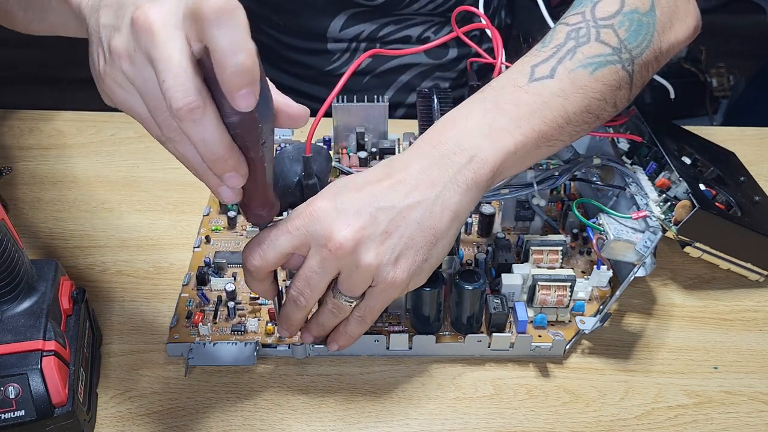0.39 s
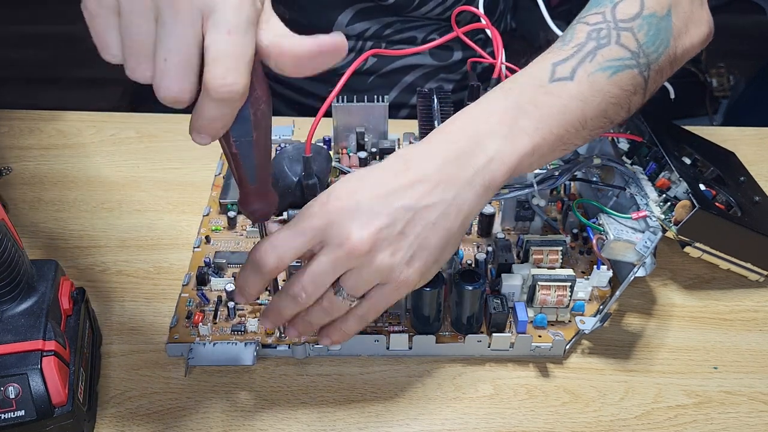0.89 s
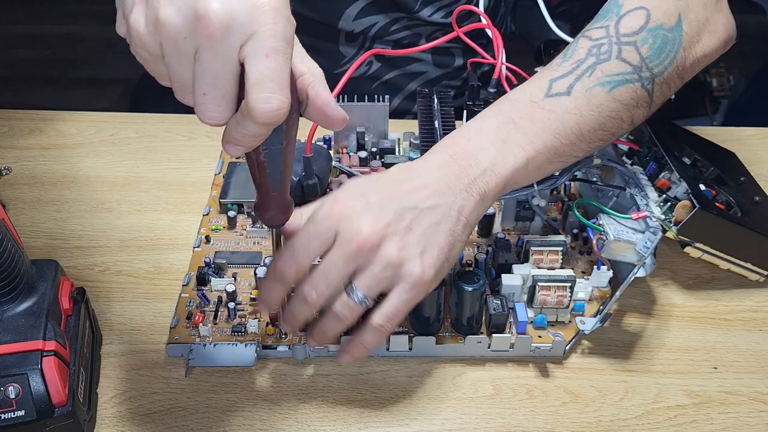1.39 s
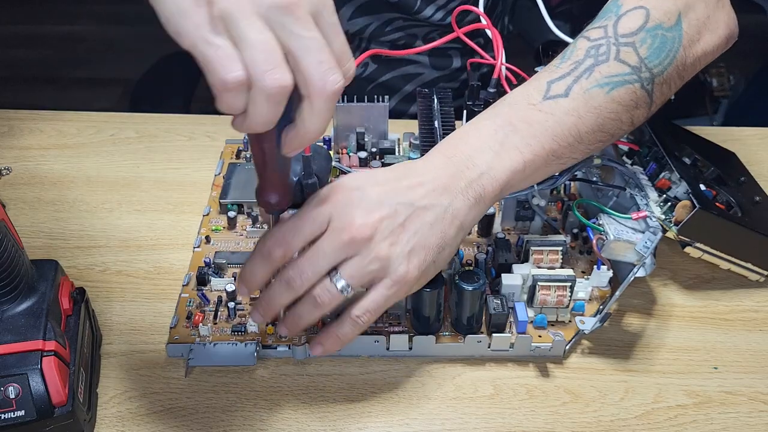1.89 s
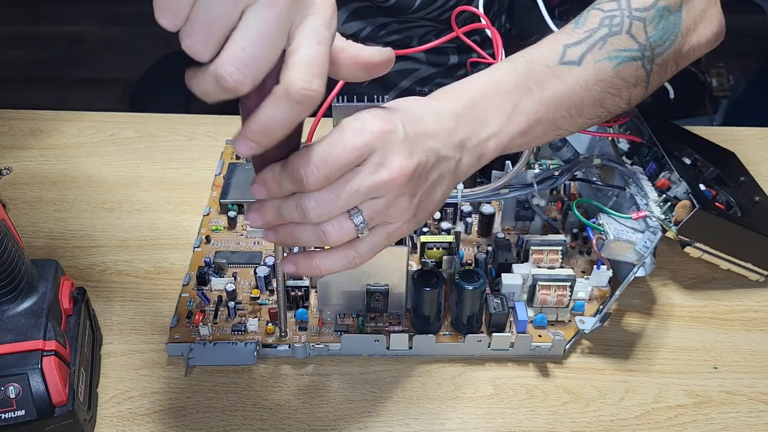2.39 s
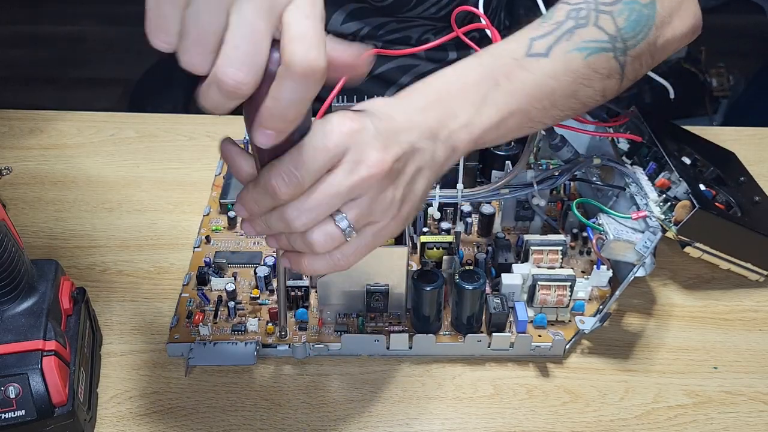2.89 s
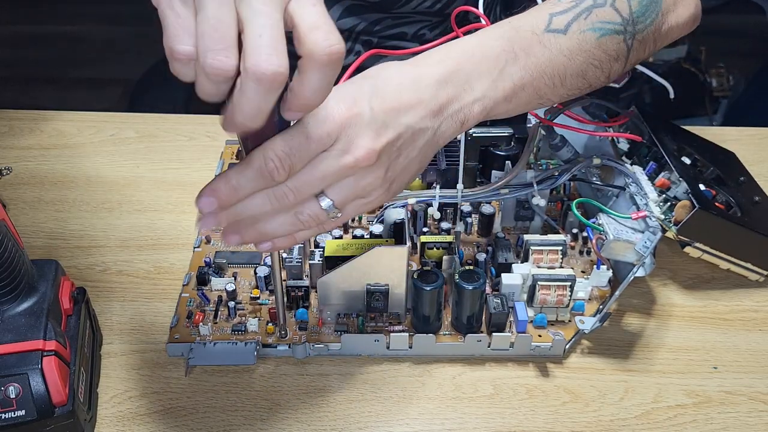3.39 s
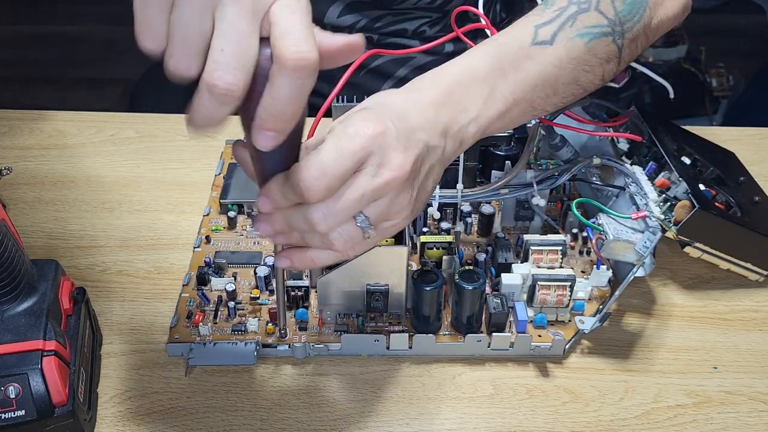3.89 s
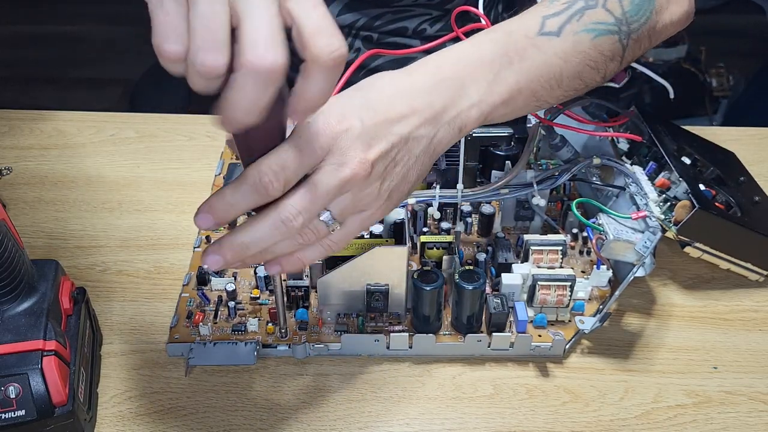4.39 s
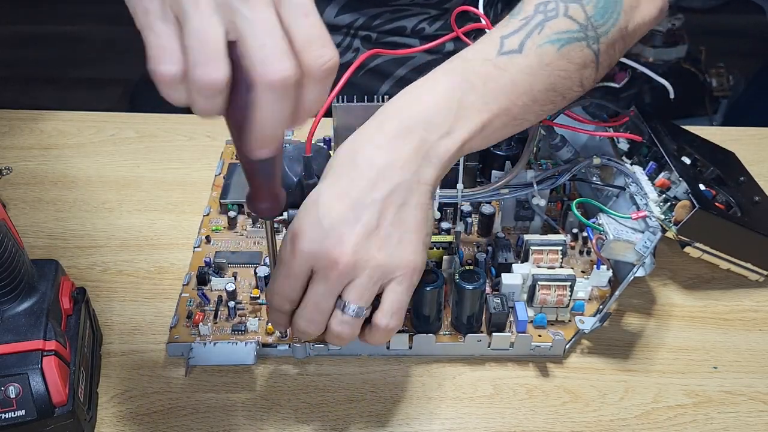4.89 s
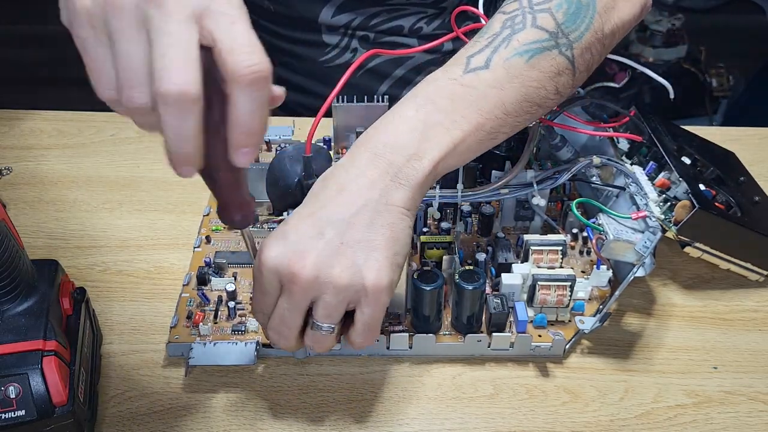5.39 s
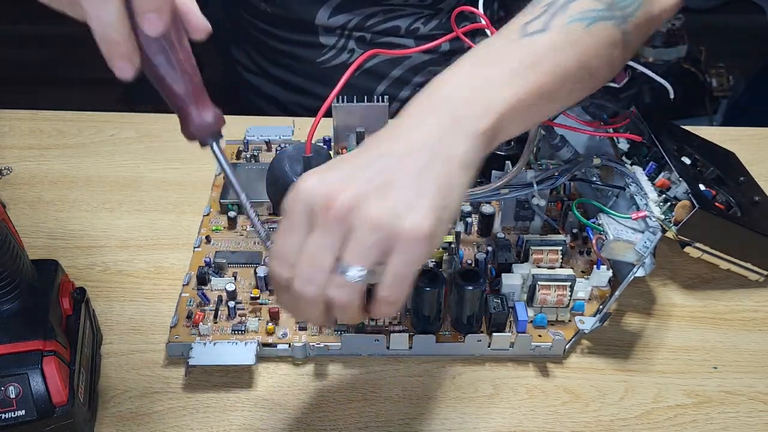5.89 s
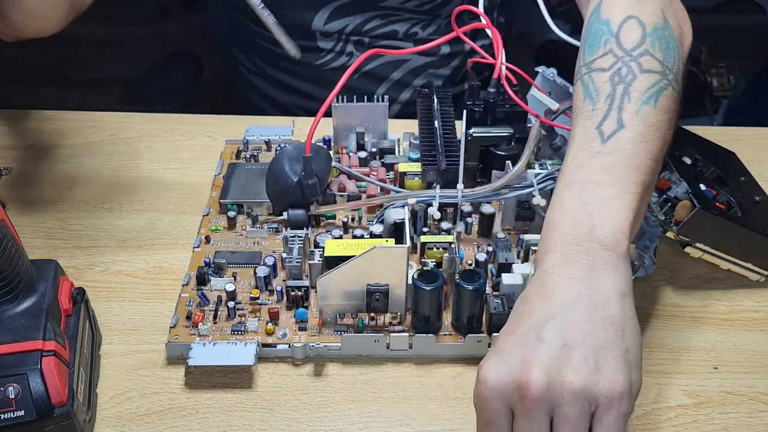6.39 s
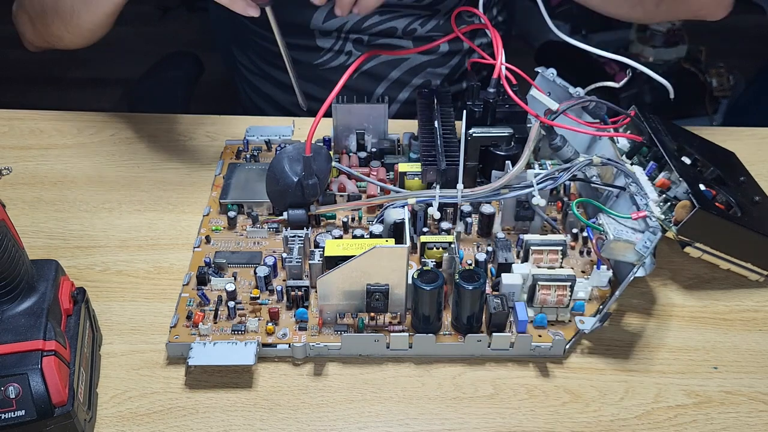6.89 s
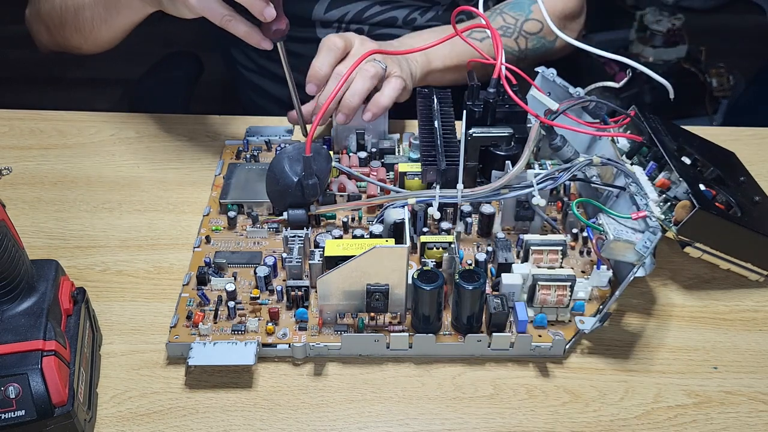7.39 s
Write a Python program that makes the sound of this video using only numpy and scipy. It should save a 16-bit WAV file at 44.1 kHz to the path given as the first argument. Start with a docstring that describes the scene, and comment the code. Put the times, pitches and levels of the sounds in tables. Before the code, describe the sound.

Quiet workbench sounds, heard close in stereo: sparse light ticks at first over fan hum and a wavering low drone that stops before three seconds. Fingers rustle and the board clatters, with three sharp knocks standing out, the first with a heavy table thud. The tip scrapes, a small screw ticks on wood, a quiet gap follows, then thin metallic squeaks.

```python
"""From the start a hand screwdriver taps and slips on steel over a fan hum and, until 2.85 s, a drone.
A circuit board in its chassis rattles, the wooden table thuds, skin brushes the handle: noise-driven modes
and filtered noise, in a small room at two ports. Hard blows fall near 3.1, 4.9 and 5.6 s. The tip scrapes
from 5.2 s, a freed screw bounces as bursts of noise near 6.4 s, the skin hiss on the handle stops at 7.1 s,
and last scrapes and squeaks follow."""
import sys
import numpy as np
from scipy import signal
from scipy.io import wavfile
from scipy.ndimage import uniform_filter1d

SR = 44100
rng = np.random.default_rng(int(sys.argv[2]) if len(sys.argv) > 2 else 0)


def dump(signal):
    """Clip the signal to [-1, 1] and save it as 16-bit WAV at the path in sys.argv[1]."""
    limited = np.clip(np.atleast_2d(signal).T, -1, 1)
    pcm = np.round(limited * 32767).astype(np.int16)
    wavfile.write(sys.argv[1], SR, pcm)


def makeup_ratio(level_db):
    """Linear amplitude ratio for a level in decibels (20 dB per factor of ten)."""
    decades = np.asarray(level_db, float) / 20
    return 10 ** decades


N = 332073


def evened(x):
    """Scales to rms 1."""
    return x / np.sqrt(np.mean(x ** 2) + 1e-20)


def read(points, hz):
    """Reads a table on a log frequency axis."""
    f, value = np.transpose(points)
    return np.interp(np.log(hz + 1), np.log(f + 1), value)


def curve(rows, axis):
    """Gain over time from a dB column, silent outside the table."""
    rows = np.array(rows)
    return makeup_ratio(np.interp(np.arange(N) / SR, rows[:, 0], rows[:, axis], -200, -200))


def add(mix, s, sound):
    """Mixes a sound in at s seconds."""
    part = mix[..., round(s * SR):][..., :sound.shape[-1]]
    part += sound[..., :part.shape[-1]]


def band(x, lo_hz, hi_hz):
    """Band-pass."""
    return signal.sosfilt(signal.butter(2, [lo_hz, min(hi_hz, 20000)], "band", fs=SR, output="sos"), x)


def resonate(x, hz, width_hz):
    """One resonance of gain 1."""
    return signal.lfilter(*signal.iirpeak(hz, hz / width_hz, SR), x)


def convolve(x, response):
    """Convolution along time, cut to the scene length."""
    return signal.oaconvolve(x, response, axes=1)[:, :N]


def body(modes, like=0.79):
    """Ring of a struck thing at both ports, a sum of dying sines; lower like spreads the port phases."""
    t = np.arange(SR // 2) / SR
    out = np.zeros((2, len(t)))
    for hz, db, t60_s in modes:
        lag = (1 - like) * np.pi * (rng.random() - .5) * np.array([[1], [-1]])
        out += makeup_ratio(db - 60 * t / t60_s) * np.sin(2 * np.pi * hz * t + lag)
    return out / np.linalg.norm(out[0])


def strokes(rows):
    """Gain over time of strokes that swell to a peak and fall away, with uneven pressure."""
    stroke_db, flicker_db, step_s = 20, 1.5, .002  # rise and fall times span stroke_db
    s, db, rise_s, fall_s = np.transpose(rows)[..., None]
    t = np.arange(0, N / SR + .01, step_s)
    distance = np.maximum((s - t) / rise_s, (t - s) / fall_s)
    power = makeup_ratio(2 * (db - stroke_db * distance)).sum(0)
    flicker = makeup_ratio(flicker_db * evened(uniform_filter1d(rng.standard_normal(len(t)), size=10)))
    return np.interp(np.arange(N) / SR, t, np.sqrt(power) * flicker)


def rattle(rows, left_db):
    """Uneven contacts of each blow on three parts; low parts start softer and rattle longer."""
    force = np.zeros((3, 2, N))
    t = np.arange(5000) / SR
    # one row per part, low to high
    rise, stretch = np.array([[.7], [.3], [.2]]), np.array([[1.8], [1.2], [.9]])
    crack = np.array([[.1], [.6], [1.5]])
    like = np.array([[.85], [.4], [.15]])  # left-right likeness
    side_db = np.outer(left_db, [.5, -.5])
    for (s, db, hard_db, length_s), (a, b, c) in zip(rows, rng.standard_normal((len(rows), 3, 5000))):
        shape = (1 - np.exp(-t / (rise * length_s))) * np.exp(-t / (stretch * length_s))
        shape = shape * (1 + crack * np.exp(-t / 0.0033))  # the first contact is the hardest
        shape = shape * makeup_ratio(2.8 * evened(uniform_filter1d(c, 30)))
        shape /= np.linalg.norm(shape, axis=1)[:, None]
        right = like * a + np.sqrt(1 - np.minimum(like, 1) ** 2) * b
        grit = np.stack([a + 0 * like, right], axis=1)
        level_db = (db + hard_db * np.array([-1, 0, 1]))[:, None] + side_db
        add(force, s - .001, makeup_ratio(level_db)[..., None] * grit * shape[:, None])
    return force


# blows of the tip: (time [s], relative level [dB], hardness: gained by steel, lost by board [dB],
# rattle decay before each part's stretch [s])
TIP_BLOWS = [(.075, -88, 15, 0.0085), (.437, -64.5, 5.5, 0.0051), (.645, -75.5, -6.5, 0.014),
             (.982, -73.5, 5, 0.0042), (1.352, -61.5, 13, 0.0025), (1.438, -82, -2, .0043),
             (1.56, -72, 5, 0.014), (1.71, -63.5, 5.5, 0.0029), (1.783, -55, -10, 0.0061),
             (1.797, -48, -1.5, 0.0034), (1.858, -57, -9, 0.0033), (1.907, -60.5, 1, 0.0056),
             (2.289, -77, 13.5, 0.0077), (2.533, -65, 0, 0.028), (2.624, -72, 10, 0.0046),
             (2.69, -69, 0, 0.0059), (2.885, -64.5, -7, 0.013), (2.961, -57.5, 3.5, 0.0066),
             (2.998, -53.5, -2, 0.012), (3.105, -35, 2, 0.0075), (3.124, -49, 11, 0.021),
             (3.227, -50.5, -5.5, 0.0083), (3.549, -79, -3, 0.0036), (3.79, -77.5, -6, 0.0043),
             (3.933, -65, -4.5, 0.0084), (4.013, -61, -10.5, 0.012), (4.026, -55.5, -3.5, 0.0062),
             (4.089, -64.5, -2, 0.0051), (4.13, -60.5, 0, 0.011), (4.281, -70.5, -2, 0.011),
             (4.357, -51, 12, 0.0069), (4.563, -70, 5.5, .012), (4.799, -72, 15.5, 0.003),
             (4.875, -37.5, 5.5, 0.014), (5.055, -64.5, 6, 0.016), (5.144, -72, 4, 0.0046),
             (5.377, -75.5, 9, 0.023), (5.512, -69, 11.5, 0.04), (5.567, -47.5, 7.5, 0.0069),
             (5.632, -34.5, 10.5, 0.007), (5.638, -38.5, 2.5, 0.012), (5.889, -80.5, 18.5, 0.0085)]
# board modes, then steel modes: (frequency [Hz], relative level [dB], t60 [s])
BOARD_MODES = [(610, -9, 0.084), (840.4, -5.5, 0.25), (1134, -14, 0.087), (1226, 2, 0.041),
               (1290, -4, 0.031), (1430, -19, .08), (1820, -23.5, .07)]
STEEL_MODES = [(5227, -16, .3), (7957, 0, .065), (8296, -1, .06), (8570, -3, .07), (9189, -10, .08),
               (14355, -8, .05)]


def taps():
    """The rattle is heard as broad clatter and rings the clearest modes of board and steel."""
    board, chassis, steel = rattle(TIP_BLOWS, [-1.5, 5, 11.])
    clatter = makeup_ratio(39) * band(band(board, 294, 1800), 320, 3400)
    clatter += makeup_ratio(32.5) * band(chassis, 2040, 6800)
    clatter += makeup_ratio(27) * band(steel, 5100, 17000)
    # only hard blows set the shaft ringing
    hard = steel * np.tanh(uniform_filter1d(abs(steel), 200) / makeup_ratio(-47.0)) ** 2
    board_ring = convolve(board, makeup_ratio(19.5) * body(BOARD_MODES, like=0.73))
    steel_ring = convolve(hard, makeup_ratio(19.5) * body(STEEL_MODES, like=0.1))
    return clatter + board_ring + steel_ring


# dropped screw on the table: (time [s], relative level [dB], hardness: gained by high part,
# lost by low part [dB], rattle decay before each part's stretch [s])
SCREW_BOUNCES = [(6.39, -66, 1.1, 0.0095), (6.449, -48.5, 1.3, 0.0016), (6.47, -52, 1.4, 0.0024),
                 (6.505, -60, 3.6, 0.0037)]


def screw():
    """A small screw has no bass: a dry knock on wood and a bright tick."""
    low, middle, high = rattle(SCREW_BOUNCES, [.3, 2.5, 6.])
    knock = makeup_ratio(42.5) * band(band(low, 1130, 2750), 790, 3400)
    return knock + makeup_ratio(33.5) * band(middle, 2800, 8600) + makeup_ratio(31.5) * band(high, 6800, 20000)


# squeaks of the tip, and at 5.563 s the ring of a hard blow: (time [s], relative level [dB],
# frequency [Hz], width of each resonator pass [Hz], length [s])
SQUEAKS_AND_RING = [(0.441, -75.5, 2030, 300, 0.074), (0.628, -77, 1420, 116, 0.073),
                    (1.659, -66.5, 5970, 200, 0.043), (1.961, -67.5, 3410, 120, 0.057),
                    (1.951, -64, 6700, 150, .06), (4.308, -82, 2770, 60, 0.033),
                    (5.563, -46, 3730, 299, 0.03), (5.193, -83.5, 6260, 80, 0.15),
                    (5.361, -69.5, 6230, 120, 0.1), (7.227, -69.5, 3455, 60, 0.029),
                    (7.335, -65.5, 3445, 79, 0.087), (7.45, -86, 4480, 60, 0.1)]


def squeaks_and_ring():
    """Noise through one narrow resonance, passed twice, swelling and fading: stick-slip or a ring."""
    out = np.zeros((2, N))
    noises = rng.standard_normal((len(SQUEAKS_AND_RING), 2, 8000))
    for (s, db, hz, width_hz, length_s), grit in zip(SQUEAKS_AND_RING, noises):
        tone = evened(resonate(resonate(grit, hz, width_hz), hz, width_hz))
        tone = tone[:, -round(length_s * SR):]
        add(out, s, makeup_ratio(db) * tone * signal.windows.tukey(tone.shape[1], .7) * makeup_ratio([[2], [-2]]))
    return out


# tip sliding along metal: (peak time [s], level [dB], rise [s], fall [s])
TIP_SLIDES = [(5.2, -78.5, 0.039, 0.45), (5.41, -71.5, 0.13, 0.068), (7.25, -67.5, 0.078, 0.15),
              (7.36, -62, 0.066, 0.17), (7.41, -69, 0.12, 0.11)]
# resonances under the sliding tip: (frequency [Hz], width [Hz], relative level [dB])
SLIDE_RESONANCES = [(1090, 320, -5), (1823, 88, -12), (2180, 99, -2), (3445, 140, -6.5), (5300, 36, 5),
                    (5560, 460, -13), (6210, 92, -6), (8160, 51, -4), (8200, 1300, -14), (9390, 92.3, -1.5),
                    (15550, 750, -18.5)]


def scrape():
    """Dense tiny slips of the tip hiss and excite the resonances of shaft and screw."""
    slips = rng.standard_normal((2, N)) * (rng.random(N) < .3)
    ring = sum(makeup_ratio(db) * evened(resonate(slips, hz, width_hz)) * np.sqrt(width_hz)
               for hz, width_hz, db in SLIDE_RESONANCES)
    hiss = evened(band(slips, 780, 20000))
    return (evened(ring) + 0.4 * hiss) * strokes(TIP_SLIDES)


# pushes: (time [s], relative level on lowest group [dB], relative level on upper groups [dB])
TABLE_PUSHES = [(.101, -57, -69), (0.638, -66, -50.5), (1.569, -51.5, -62), (1.796, -39, -40.5),
                (1.858, -39.5, -49), (1.959, -69, -53), (2.53, -65, -50.5), (2.689, -53, -53),
                (2.908, -76, -48), (2.996, -62, -41), (3.103, -42, -29), (3.23, -62, -51),
                (3.549, -50, -58), (3.615, -49, -55), (3.837, -72, -70), (4.008, -50, -44),
                (4.288, -52, -52.5), (4.362, -46, -53.5), (4.476, -40.5, -70), (4.578, -53.5, -54.5),
                (4.885, -48, -34), (5.068, -56, -56.5), (5.368, -50.5, -54.5), (5.57, -72, -66),
                (5.64, -52, -48.5)]
# three groups of table modes: (frequency [Hz], relative level [dB], t60 [s])
TABLE_MODES = [
    [(69.9, 5.5, 0.19), (50.6, -15.5, 0.22)],
    [(134, 0, 0.24)],
    [(200, -5, 0.17), (240.3, 2, 0.1), (314, -5, 0.08), (383.8, -11.5, 0.15), (456, -11, .12),
     (518, -17, 0.097)],
]
# range in which each group radiates: (low edge [Hz], high edge [Hz])
TABLE_RANGES = [(42, 110), (105, 175), (175, 640)]
# weight of the hands on board and table: (time [s], relative rumble level [dB])
HAND_WEIGHT = [(0, -66), (.71, -62.5), (1, -71), (1.7, -61), (1.92, -51), (2.29, -65.5), (2.62, -54),
               (2.95, -62.5), (3.18, -37.5), (3.38, -65.5), (3.8, -51.5), (4.45, -57), (4.6, -54.5),
               (4.7, -67), (4.95, -42), (5.04, -50.5), (5.14, -49), (5.3, -64), (5.6, -53.5), (5.8, -69.5),
               (6.7, -87), (7.1, -82.5), (7.42, -64), (7.53, -75.5)]


def table():
    """Soft pushes ring the low modes of the table top; leaning hands keep them rumbling."""
    force = np.zeros((3, N))
    t = np.arange(4000) / SR
    swell = t * np.exp(-t / np.array([[.002], [.0015], [.008]]))
    swell = swell / swell.sum(axis=1)[:, None]
    uneven = np.array([[.3], [.3], [14.]])  # the long, gritty part of a landing drives the upper modes
    noises = rng.standard_normal((len(TABLE_PUSHES), 4000))
    for (s, weight_db, knock_db), grit in zip(TABLE_PUSHES, noises):
        push = makeup_ratio(np.array([weight_db, knock_db, knock_db]))[:, None]
        add(force, s - .004, push * (1 + uneven * grit) * swell)
    rings = [band(body(modes), *hz) * makeup_ratio(db)
             for modes, hz, db in zip(TABLE_MODES, TABLE_RANGES, [33, 37, 35])]
    thuds = sum(convolve(f[None], ring) for f, ring in zip(force, rings))
    top = evened(rings[0]) + 0.73 * evened(rings[1]) + 0.41 * evened(rings[2])
    rumble = evened(convolve(rng.standard_normal((1, N)), top))
    return (thuds + rumble * curve(HAND_WEIGHT, axis=1)) * makeup_ratio([[-.6], [.6]])


# left-right likeness of noise: (frequency [Hz], likeness [-1..1])
PORT_LIKENESS = [(60, 0.97), (300, 0.14), (640, 0), (16000, 0)]


def noise(points, same=PORT_LIKENESS, patchy_db=2.0):
    """Stereo noise of a given spectrum with drifting patches."""
    hz = np.fft.rfftfreq(2048, 1 / SR)
    a, b, c, d, patches = rng.standard_normal((N // 512 + 5, 1025, 5)).T
    patches = evened(uniform_filter1d(uniform_filter1d(patches, 20, 0), 6, 1))
    like = np.clip(read(same, hz), -1, 1)[:, None]
    left = a + 1j * b
    z = np.array([left, like * left + np.sqrt(1 - like ** 2) * (c + 1j * d)])
    z *= makeup_ratio(read(points, hz)[:, None] + patchy_db * patches)
    return evened(signal.istft(z, nperseg=2048, noverlap=1536)[1][:, :N])


# fingers shifting the board: (peak time [s], level [dB], rise [s], fall [s])
BOARD_SHIFTS = [(.655, -77.5, 0.056, 0.045), (1.83, -62.5, 0.054, 0.26), (2.6, -75, 0.048, 0.55),
                (2.98, -57, 0.042, 0.15), (3.12, -38, 0.023, 0.081), (3.26, -62.5, 0.077, 0.12),
                (4.05, -68, .06, 0.22), (4.32, -68.5, 0.035, 0.19), (4.86, -62, 0.047, 0.12),
                (5.58, -75, 0.12, 0.14), (7.42, -78, 0.073, 0.059)]
# skin brushing over the handle: (peak time [s], relative level [dB], rise [s], fall [s])
SKIN_BRUSHES = [(.37, -81, 0.02, 0.11), (.52, -81, .1, 0.6), (.838, -62.5, 0.064, .06),
                (.97, -74.5, 0.19, .1), (1.19, -70.5, 0.078, 0.22), (1.286, -64, 0.16, .12),
                (1.4, -72, 0.11, 0.089), (1.67, -68, 0.1, 0.6), (2.096, -68, 0.24, 0.079),
                (2.37, -65, 0.18, .14), (2.61, -60, 0.16, 0.047), (2.7, -66, 0.043, 0.051),
                (2.866, -65, .2, 0.084), (2.95, -64, .1, 0.35), (3.35, -68, 0.11, 0.11),
                (3.47, -66.5, 0.072, 0.35), (3.7, -69.5, 0.59, 0.43), (3.87, -61.5, 0.14, 0.11),
                (4, -65.5, 0.28, 0.42), (4.25, -70, 0.38, 0.35), (4.574, -70.5, 0.28, 0.17),
                (4.79, -65, 0.017, 0.56), (5.05, -85, 0.25, 0.23), (5.15, -62.5, 0.1, 0.065),
                (5.45, -77, 0.2, 0.23), (5.77, -72, .1, 0.12), (5.91, -74, 0.051, 0.28)]
# skin hiss spectrum: (frequency [Hz], relative density [dB])
SKIN_SPECTRUM = [(1470, -36.5), (2500, -12.5), (4370, -14), (5440, -2), (6760, -2.5), (8200, -1.5),
                 (9580, 0.5), (15200, -2), (16000, -28)]


def hands():
    """The board rustles as fingers shift or weigh on it; skin hisses on the handle, nearer the left port."""
    rustle_re_weight_db, touch_db, hiss_end_s = -27, -84.5, 7.1  # steady skin hiss until hiss_end_s
    a, b = rng.standard_normal((2, N))
    rub = a + 0.78 * b * np.array([[1], [-1]])
    rustle = band(rub, 380, 3400) + makeup_ratio(-10.0) * convolve(rub, body(BOARD_MODES))
    skin = noise(SKIN_SPECTRUM, patchy_db=3) * makeup_ratio([[2.5], [-2.5]])
    touch = makeup_ratio(touch_db) * (np.arange(N) < hiss_end_s * SR)
    shifting = strokes(BOARD_SHIFTS) + makeup_ratio(rustle_re_weight_db) * curve(HAND_WEIGHT, axis=1)
    return evened(rustle) * shifting + skin * (strokes(SKIN_BRUSHES) + touch)


# reverberation: (frequency [Hz], t60 [s])
ROOM_T60 = [(300, 0.36), (1000, 0.15), (4000, 0.23), (16000, 0.14)]


def room(x):
    """Sparse random-sign reflections, each band dying at its own speed; two sets alternate at turn_hz."""
    turn_hz = 1.7
    echoes = np.zeros((4, SR // 2))
    at = np.arange(160, SR // 2 - 20, 10) + rng.integers(0, 10, (4, (SR // 2 - 171) // 10))
    np.put_along_axis(echoes, at, rng.choice([-1., 1.], at.shape), 1)
    hz, t, z = signal.stft(echoes, SR, nperseg=256)
    decay = makeup_ratio(-60 * t / read(ROOM_T60, hz)[:, None])
    tail = signal.istft(z * decay, SR, nperseg=256)[1]
    tail /= np.linalg.norm(tail[0])
    turn = np.exp(2j * np.pi * turn_hz * np.arange(N) / SR)
    mono = x.mean(0)
    return convolve((mono * turn.real)[None], tail[:2]) + convolve((mono * turn.imag)[None], tail[2:])


# room air spectrum: (frequency [Hz], relative density [dB])
AIR_SPECTRUM = [(25, -31.5), (70, -3), (160, -10.5), (200, -0.5), (285, -4), (340, -13.5), (600, -25.5),
                (1000, -30), (2050, -32), (4000, -34), (7000, -43.5), (8300, -43.5), (11000, -31),
                (16000, -32.5)]
# fan blade tones: (frequency [Hz], level [dB])
FAN_TONES = [(199.5, -76), (239.3, -77), (279.5, -74)]
# drone that swells and then stops: (time [s], level [dB])
DRONE_LEVEL = [(0.0, -64), (0.17, -70), (0.3, -63), (1.17, -65.5), (1.33, -73.5), (1.55, -61.5),
               (1.7, -71.5), (1.99, -61), (2.17, -71), (2.38, -58), (2.52, -67.5), (2.85, -74)]


def hum():
    """Room air as shaped noise; fan tones and one drone as sines wavering with narrow noise."""
    air_db, drone_hz = -66.5, 303
    t = np.arange(N) / SR
    out = makeup_ratio(air_db) * noise(AIR_SPECTRUM)
    tones = [(hz, makeup_ratio(db), 2.5) for hz, db in FAN_TONES]
    tones.append((drone_hz, curve(DRONE_LEVEL, axis=1), 3.))
    for hz, gain, width_hz in tones:
        waver = evened(resonate(rng.standard_normal(N), hz, width_hz))
        out += gain * evened(np.sin(2 * np.pi * (hz * t + rng.random())) + .3 * waver)
    return out


def scene():
    """All sources; the taps and the dropped screw also fill the room."""
    near = taps() + screw()
    return near + makeup_ratio(-1.5) * room(near) + squeaks_and_ring() + scrape() + table() + hands() + hum()


def roll_off(x):
    """The treble ends steeply here."""
    return signal.sosfilt(signal.butter(12, 17160, fs=SR, output="sos"), x)


# overall tone colour with the top cut off near 15.8 kHz: (frequency [Hz], gain [dB])
TONE_COLOUR = [(20, -0.5), (7000, -1.5), (8200, 3.5), (9500, -5), (14000, -8), (15300, -4.5), (15750, 0.5),
               (15900, -20), (16800, -20.5), (17200, -54)]


def record(dry):
    """Causal, minimum-phase filter: overall tone colour and a steep top cut-off near 15.8 kHz."""
    log_gain = np.log(makeup_ratio(read(TONE_COLOUR, abs(np.fft.fftfreq(8192, 1 / SR)))))
    colour = np.fft.ifft(np.exp(np.conj(signal.hilbert(log_gain)))).real[:4096]
    mix = convolve(dry, colour[None])
    return roll_off(mix)


dry = scene()
out = record(dry)
dump(out)
```